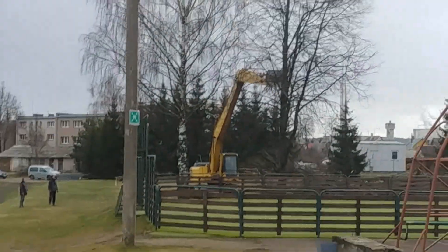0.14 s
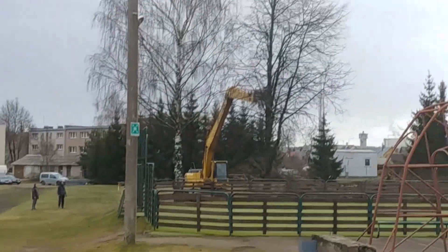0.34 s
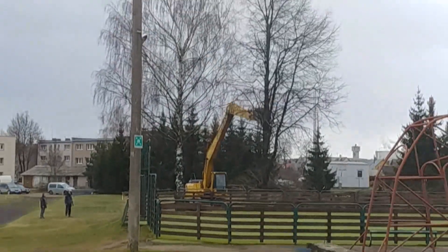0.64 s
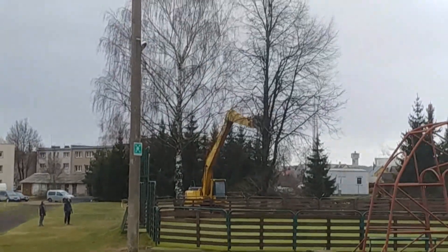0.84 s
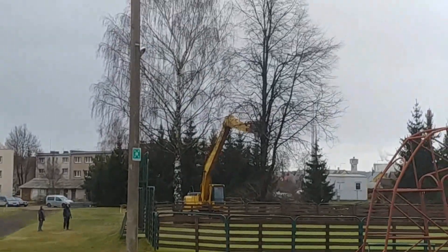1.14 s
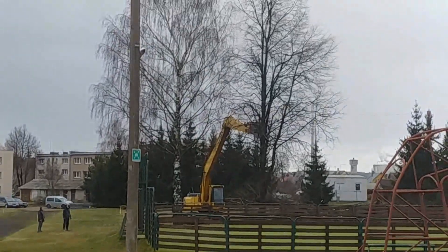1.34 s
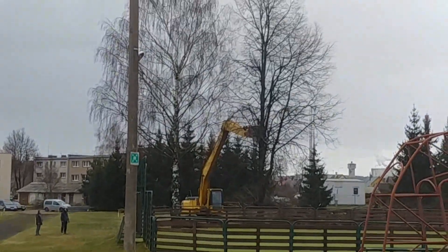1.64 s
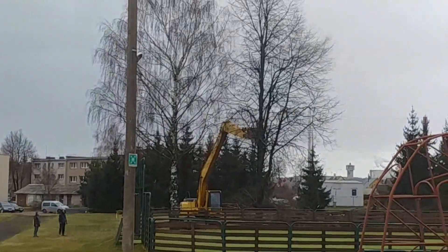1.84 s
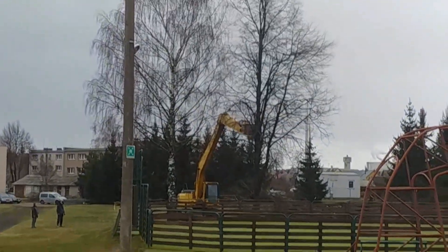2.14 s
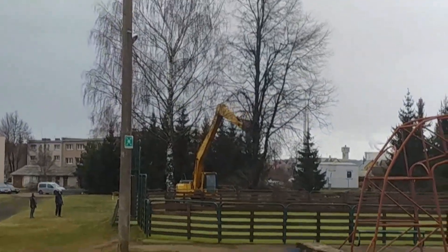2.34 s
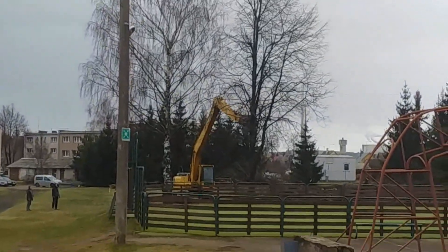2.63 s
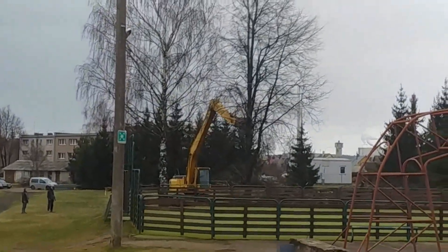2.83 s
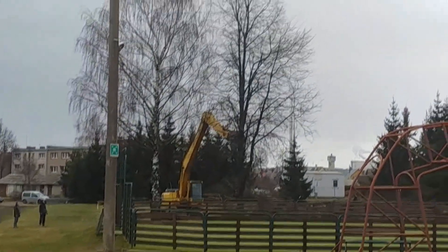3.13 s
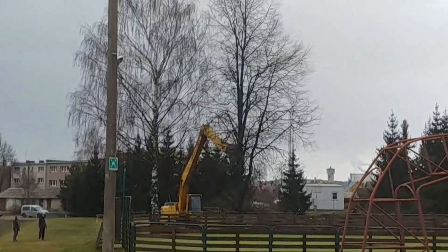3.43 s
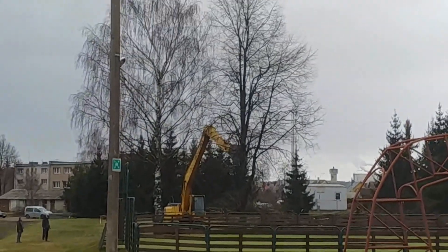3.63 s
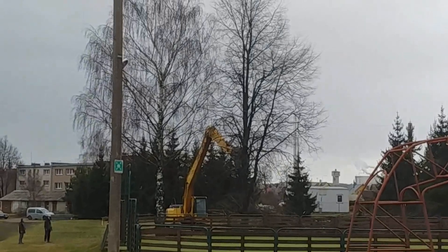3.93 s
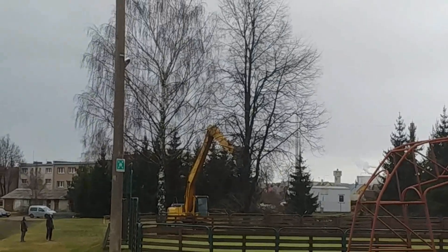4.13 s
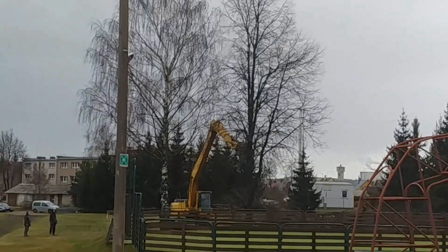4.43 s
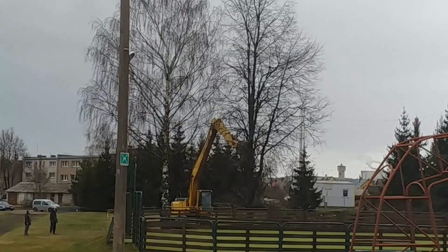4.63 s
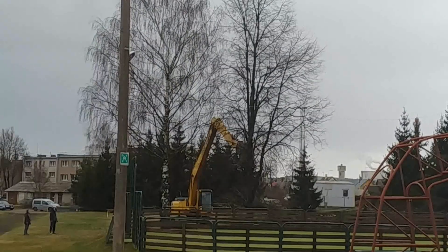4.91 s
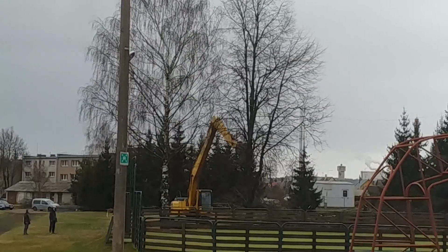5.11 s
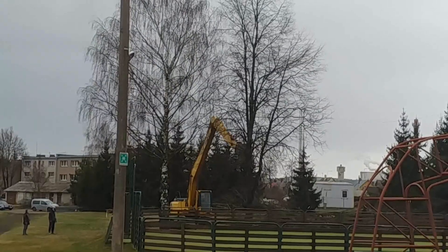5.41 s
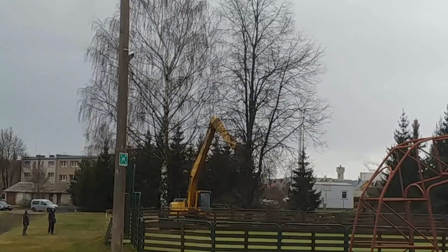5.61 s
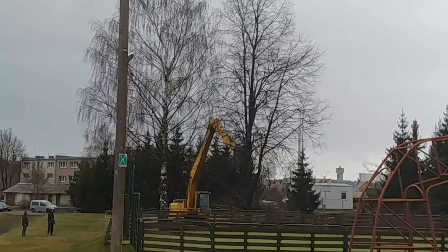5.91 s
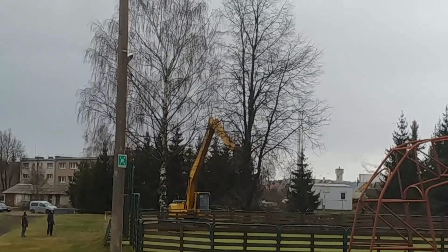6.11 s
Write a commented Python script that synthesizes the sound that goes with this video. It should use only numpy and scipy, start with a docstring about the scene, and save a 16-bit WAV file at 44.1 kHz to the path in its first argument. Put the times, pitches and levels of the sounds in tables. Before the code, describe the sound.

A diesel excavator drones steadily across a park while tree limbs crack, splinter and snap, building to heavy breaks and a thump.

```python
"""Across a park, a six-cylinder diesel excavator drones throughout while its grab tears limbs from a tall tree.
At once a dry limb breaks in a run of fibre fractures; a faint high rustle brushes the left side until past 2 s.
A limb squeaks at 1 s, a swish falls in pitch near 1.8 s, and snaps and twig crackle thicken after 2.2 s.
From 3.7 s the trunk jolts too; near 5 s a big limb gives way and thumps down, and the last breaks end the scene.
Noise, sines and random clicks are filtered into each source; trees and house fronts scatter the cracks back."""
import sys
import numpy as np
from scipy import signal
from scipy.fft import rfft, irfft, next_fast_len
from scipy.io import wavfile
from scipy.ndimage import map_coordinates

SR = 44100
rng = np.random.default_rng(int(sys.argv[2]) if len(sys.argv) > 2 else 0)


def to_wav(s):
    """Save 16-bit WAV."""
    ch = np.atleast_2d(s).T  # columns
    pcm = np.round(np.clip(ch, -1, 1) * 32767)  # PCM
    wavfile.write(sys.argv[1], SR, pcm.astype(np.int16))


N = 276192


def amp(db):
    """Level to gain: 20 dB is a factor of ten in amplitude."""
    return 10 ** (np.asarray(db) / 20)


def unit(x):
    """Normalisation to an rms of 1."""
    return x / np.sqrt(np.mean(x ** 2) + 1e-20)


def along(points, hz):
    """Interpolation of (f/Hz, value) points on a logarithmic frequency axis."""
    f, v = np.transpose(points)
    return np.interp(np.log(hz + 1), np.log(f + 1), v)


def curves(rows):
    """Linear interpolation in time: one value per sample for each column after t/s."""
    s, *columns = np.transpose(rows)
    return [np.interp(np.arange(N) / SR, s, column) for column in columns]


def wobble(rate):
    """Slow random modulation: a smooth curve through rate random knots a second."""
    return map_coordinates(rng.standard_normal(1024), [np.arange(N) * rate / SR], mode="wrap")


RISE_SHARE = 0.61  # a swell rises by 20 dB in this share of its fade time


def swells(rows):
    """Exponential envelopes of (t/s, level/dB, fade/s): each rises to its height, then falls 20 dB per fade."""
    t = np.arange(N) / SR
    levels = [db - 20 * np.maximum(t - s, (s - t) / RISE_SHARE) / fade for s, db, fade in rows]
    return amp(np.max(levels, axis=0))


def filtered(x, response):
    """Linear filtering: the spectrum is multiplied by a response of frequency."""
    size = next_fast_len(N + 8192)
    return irfft(rfft(x, size) * response(np.fft.rfftfreq(size, 1 / SR)), size)[..., :N]


def causal(gain):
    """Minimum phase: folding the cepstrum gives the response of this gain that rings only after the blow."""
    cepstrum = irfft(np.log(np.maximum(gain, 1e-6)))
    half = len(cepstrum) // 2
    cepstrum[1:half] *= 2
    cepstrum[half + 1:] = 0
    return np.exp(rfft(cepstrum))


# Interaural coherence of diffuse sound: f/Hz, left-right likeness/1
COHERENCE = [(25, 0.68), (70, 0.91), (200, 0.85), (600, 0.75), (2000, 0), (5000, 0.17), (10000, 0)]


def mid_side_gains(hz):
    """Coherence: the balance of sum and difference signals sets how alike left and right are."""
    turn = np.arccos(np.clip(along(COHERENCE, hz), -1, 1)) / 2
    return np.array([np.cos(turn), np.sin(turn)])


def spread(pair, spectrum):
    """Partial coherence: two unrelated signals are coloured and blended into a stereo pair of rms 1."""
    mid, side = filtered(pair, lambda hz: amp(along(spectrum, hz)) * mid_side_gains(hz))
    return unit(np.array([mid + side, mid - side]))


def tail(decay, rise, size):
    """Reverberation: stereo noise of energy 1 builds up over rise/s and decays by its t60 at each frequency."""
    hz, t, z = signal.stft(rng.standard_normal((2, size)), SR, nperseg=256)
    z = z * mid_side_gains(hz)[:, :, None]
    z = z * amp(-60 * t / along(decay, hz)[:, None]) * (1 - np.exp(-t / rise))
    mid, side = signal.istft(z, SR, nperseg=256)[1][:, :size]
    return np.array([mid + side, mid - side]) / np.linalg.norm([mid, side])


def add(track, s, sound):
    """Superposition: a stereo sound is summed in at time s."""
    start = max(round(s * SR), 0)
    track[:, start:start + sound.shape[1]] += sound[:, :max(N - start, 0)]


def ticks(rate, spread_db):
    """Random point process: tiny snaps at a mean rate per second, a few much larger than the rest."""
    sizes = amp(spread_db * np.minimum(rng.exponential(size=(2, N)), 4))
    happens = rng.random((2, N)) < rate / SR
    return happens * rng.choice([-1, 1], (2, N)) * sizes


LAWN_DELAY_S, LAWN_ECHO = .0019, .35  # lag of the ground path, its share before the band limits
LAWN_LOW_HZ, LAWN_SOFT_HZ = 850, 4000  # the bounce fades out below and above these


def grounded(x):
    """Comb interference: far sound also bounces off the ground a moment later, which hollows its mid range."""
    def response(hz):
        share = LAWN_ECHO * hz ** 4 / (hz ** 4 + LAWN_LOW_HZ ** 4) / (1 + (hz / LAWN_SOFT_HZ) ** 4)
        bounce = share * np.exp(-2j * np.pi * hz * LAWN_DELAY_S)
        return (1 + bounce) / np.hypot(1, share)
    return filtered(x, response)


# Firing rate, racing when the load lets go and sagging when it bites: t/s, f/Hz
FIRING_RATE = [(0, 90), (.09, 94.3), (.17, 93), (.27, 91.2), (.43, 88.9), (.8, 90.3), (1.09, 90.6),
               (1.23, 95.6), (1.42, 95.3), (1.53, 92.6), (1.75, 91.6), (2.35, 92.5), (2.75, 92.5),
               (3.05, 91.4), (4.2, 91.2), (5, 91.9), (6.26, 92.2)]
# Exhaust note, before drift and stereo balance: t/s, level/dB
EXHAUST_NOTE = [(0, -27), (.14, -27.5), (.19, -23), (1.17, -20), (1.25, -26.5), (1.42, -25.5),
                (1.53, -17.5), (1.62, -20.7), (2.39, -19.5), (2.65, -24), (2.98, -20), (3.38, -22),
                (3.9, -19), (4.3, -22), (4.6, -19.5), (5.42, -17), (5.49, -19.7), (6.26, -19)]
# Exhaust rumble, before drift and stereo balance: t/s, level/dB
EXHAUST_RUMBLE = [(0.0, -32), (4.44, -34), (4.53, -21.5), (4.58, -33.5), (4.93, -35.5), (5.02, -26),
                  (6.01, -32), (6.26, -23)]
# Overtones up to the whine of fan and pump: multiple of the six-firing cycle rate/1,
# level/dB (sine amplitude re the mean exhaust note, before fading)
CYCLE_OVERTONES = [(4, -34.5), (5, -30.5), (7, -35), (8, -25), (9, -25.5), (10, -19), (11, -26.5),
                   (12, -16.5), (13, -30), (14, -24), (15, -27.5), (17, -25), (18, -31.5), (22, -38),
                   (26, -31.5), (34, -37), (36, -30), (39, -37.5), (108, -46.5)]
# Spectrum of the rumble: f/Hz, relative level/dB per Hz
RUMBLE_COLOUR = [(20, -28.5), (36, -21), (52, -7), (72, 4), (110, 3.5), (160, -2.5), (215, -4),
                 (255, -18.5), (310, -22), (450, -46), (900, -75)]
# Spectrum of the clatter, before the ground bounce: f/Hz, relative level/dB per Hz
CLATTER_COLOUR = [(250, -5), (340, 2.5), (450, -0.5), (570, 0.5), (760, -5.5), (1100, -12.5), (1380, -12.5),
                  (1650, -14.5), (2300, -21.5), (3300, -19), (4600, -24.5), (7500, -27.5), (10500, -39.5),
                  (15500, -35.5)]
CLATTER_DB = -49  # before drift, ground bounce and stereo balance
OVERTONE_FADE_DB, OVERTONE_DRIFT_RAD = 2.4, .12  # drift also grows with the root of the multiple
CHUG = .35  # depth of the rumble's pulsing


def engine():
    """Harmonic series: a tone at the firing rate, overtones in sixths of it from unequal cylinders, and noise."""
    (firing_hz,), (note_db,), (rumble_db,) = curves(FIRING_RATE), curves(EXHAUST_NOTE), curves(EXHAUST_RUMBLE)
    phase = 2 * np.pi * np.cumsum(firing_hz) / SR
    cycle = phase / 6  # six firings make one working cycle

    # moving air makes each tone fade and drift on its own
    note = np.sqrt(2) * amp(note_db - 0.56 + 0.56 * wobble(14)) * np.sin(phase)
    overtones = 0
    for multiple, db in CYCLE_OVERTONES:
        drift = OVERTONE_DRIFT_RAD * np.sqrt(multiple) * wobble(12)
        overtones = overtones + amp(db + OVERTONE_FADE_DB * wobble(6)) * np.sin(round(multiple) * cycle + drift)
    tones = note + amp(note_db.mean()) * overtones

    chug = 1 + CHUG * np.sin(2 * cycle + wobble(4))
    rumble = spread(chug * rng.standard_normal((2, N)), RUMBLE_COLOUR)
    rumble = amp(rumble_db + 0.24 + .5 * wobble(4.3)) * rumble

    beats = 1 + 0.14 * np.sin(phase) + 0.058 * np.sin(2 * cycle)
    clatter = grounded(spread(beats * rng.standard_normal((2, N)), CLATTER_COLOUR))
    clatter = amp(CLATTER_DB + wobble(9)) * clatter
    return tones * amp([[1.7], [-2]]) + (rumble + clatter) * amp([[1.3], [-1.3]])


TOP_HZ = 15900  # upper band limit
# Brushes, before flutter and stereo balance: t/s (at the height), level/dB, fade time/s
RUSTLE_BRUSHES = [(.218, -49, 0.061), (.45, -56.5, 0.22), (.58, -62, 0.26), (.78, -64.5, 0.26),
                  (1.67, -73, 0.25), (1.937, -47.5, 0.057), (2.23, -63.5, 0.086)]
# Spectrum of the rustle: f/Hz, relative level/dB per Hz
RUSTLE_SPECTRUM = [(2000, -39), (6000, -13.5), (10500, -25), (13000, -14.5), (15500, -8)]
RUSTLE_FLUTTER_DB = 1.8


def rustle():
    """Amplitude-modulated noise: a thin, very high hiss comes in a few brushes, mostly on the left."""
    noise = rng.standard_normal((2, N))
    hiss = filtered(noise, lambda hz: amp(along(RUSTLE_SPECTRUM, hz)) * (hz < TOP_HZ))
    flutter = amp(RUSTLE_FLUTTER_DB * wobble(32))
    return swells(RUSTLE_BRUSHES) * flutter * unit(hiss) * amp([[4], [-11]])


SWISH_S, SWISH_DB, SWISH_FADE_S = 1.82, -57.5, .4
SWISH_HZ, SWISH_OCTAVES_PER_S, SWISH_WIDTH_HZ = 4100, -3, 1400


def swish():
    """Ring modulation: low noise times a falling sine gives a narrow hiss, a branch sweeping through the crown."""
    octaves = np.clip(SWISH_OCTAVES_PER_S * (np.arange(N) / SR - SWISH_S), -.5, .5)
    centre_hz = SWISH_HZ * 2 ** octaves
    low_noise = filtered(rng.standard_normal((2, N)), lambda hz: np.exp(-(hz / SWISH_WIDTH_HZ) ** 2))
    hiss = unit(low_noise * np.sin(2 * np.pi * np.cumsum(centre_hz) / SR))
    return swells([(SWISH_S, SWISH_DB, SWISH_FADE_S)]) * hiss


# Jolts of the heavy trunk: t/s, level/dB (before mode levels and stereo balance), f/Hz struck hardest
TRUNK_JOLTS = [(3.755, -20, 395), (5.039, -21, 333), (5.124, -18, 303), (6.168, -15, 219),
               (6.251, -16, 280)]
# Modes of the trunk: f/Hz, relative level/dB
TRUNK_MODES = [(215, 0.5), (275, -2), (335, -3.5), (395, -1.5), (485, -2.5)]
TRUNK_T60_S, JOLT_DB_PER_OCTAVE = .13, 14  # decay; loss of a mode away from the struck pitch
THUMP_S, THUMP_HZ, THUMP_DB = 5.228, 66, -15  # thump level before stereo balance


def thuds():
    """Modal synthesis: decaying low modes as big limbs give way, and one deep thump as the wood comes down."""
    out = np.zeros((2, N))
    t = np.arange(SR // 2) / SR
    envelope = amp(-60 * t / TRUNK_T60_S) * (1 - np.exp(-t / 0.00049)) * amp([[1], [-1]])
    for s, db, struck_hz in TRUNK_JOLTS:
        modes = 0
        for hz, mode_db in TRUNK_MODES:
            loss_db = JOLT_DB_PER_OCTAVE * abs(np.log2(hz / struck_hz))
            modes = modes + amp(db + mode_db - loss_db) * np.sin(2 * np.pi * hz * t)
        add(out, s, envelope * modes)
    add(out, THUMP_S, envelope * amp(THUMP_DB) * np.sin(2 * np.pi * THUMP_HZ * t))
    return out


# Decay among the nearby trees: f/Hz, t60/s
THICKET_DECAY = [(200, 0.12), (1500, 0.055), (8000, 0.088)]
SPLINTERS_PER_S, SPLINTER_TOP_HZ = 90, 7500
SPLINTER_HZ, SPLINTER_OCTAVES, SPLINTER_CYCLES = 2640, 0.55, 4.4  # typical pitch, scatter, cycles to -60 dB


def splinters(size=512):
    """Damped oscillation: single twigs snap at random, each with its own pitch, size and side; rms 1."""
    t, out = np.arange(size) / SR, np.zeros((2, N))
    count = round(SPLINTERS_PER_S * N / SR)
    times = rng.random(count) * N / SR
    traits = np.clip(rng.standard_normal((count, 3)), -2, 2)
    for s, (pitch, big, side) in zip(times, traits):
        hz = min(SPLINTER_HZ * 2 ** (SPLINTER_OCTAVES * pitch), SPLINTER_TOP_HZ)
        decay = amp(2.6 * big - 60 * t * hz / SPLINTER_CYCLES)
        snap = np.sin(2 * np.pi * hz * t) * decay * (1 - np.exp(-t * hz))
        add(out, s, snap * amp([[2 * side], [-2 * side]]))
    scattered = signal.fftconvolve(out, tail(THICKET_DECAY, rise=0.0058, size=4096), axes=1)[:, :N]
    return unit(filtered(out + scattered, lambda hz: 1 / (1 + (hz / SPLINTER_TOP_HZ) ** 10)))


# Limbs crushed in the grab and pulled through the crown: t/s (at the height), crunch level/dB,
# twig crackle level/dB (both before clumping, ground bounce and stereo balance), fade time/s
LIMB_DRAGS = [(.2, -44.5, -41, 0.29), (0.459, -44.5, -48.5, 0.28), (.78, -39.5, -68, 0.19),
              (.9, -47.5, -55, 0.41), (1.18, -47.5, -72.5, 0.61), (1.6, -48.5, -61.5, 0.31),
              (2.281, -47, -56.5, 0.39), (2.651, -42, -49, 0.39), (2.88, -45, -53.5, 0.33),
              (3.2, -52.5, -63, 0.75), (3.959, -41.5, -50, 0.38), (4.38, -50.5, -52.5, 0.73),
              (4.8, -52.5, -63.5, 0.41), (5.131, -41.5, -37, 0.23), (5.48, -52.5, -46.5, 0.085),
              (5.85, -51.5, -78, 1), (6.21, -33, -35.5, 0.17)]
# Spectrum of the crunch: f/Hz, relative level/dB per Hz
CRUNCH_SPECTRUM = [(180, -14.5), (380, 5.5), (750, 2.5), (1150, 3.5), (1380, -3.5), (1650, -1), (2200, -13),
                   (3500, -30.5), (7000, -53.5)]
# Spectrum of the fine twig ticks: f/Hz, relative level/dB per Hz
TWIG_SPECTRUM = [(700, -30.5), (1500, 0), (2000, -2.5), (2400, 1.5), (3300, -2), (4700, -5.5),
                 (7200, -11.5), (9000, -28), (10500, -54.5)]
CLUMP_DB = 2.4  # twigs and bark give way in clumps
SPLINTER_DB = -2.5  # single snaps re the fine ticks
SQUEAK_S, SQUEAK_HZ, SQUEAK_DB, SQUEAK_FADE_S = 1.007, 1595, -43.5, .05


def twigs():
    """Granular noise: bark crunches and twigs tick with each drag; a phase-modulated sine is one limb's squeak."""
    s, crunch_db, twig_db, fade = np.transpose(LIMB_DRAGS)

    crunch = spread(ticks(rate=600, spread_db=2.0), CRUNCH_SPECTRUM)
    crunch = swells(zip(s, crunch_db, fade)) * amp(CLUMP_DB * wobble(50)) * crunch

    fine = spread(ticks(rate=2200, spread_db=3.0), TWIG_SPECTRUM)
    crackle = fine + amp(SPLINTER_DB) * splinters()
    crackle = swells(zip(s, twig_db, fade)) * amp(CLUMP_DB * wobble(40)) * crackle

    squeak = np.sin(2 * np.pi * SQUEAK_HZ * np.arange(N) / SR + 2 * wobble(250))
    squeak = swells([(SQUEAK_S, SQUEAK_DB, SQUEAK_FADE_S)]) * squeak
    return (crunch + crackle + squeak) * amp([[1.1], [-1.1]])


BUILD_SHARE = .18  # time constant of a tear's build-up, as a share of its tearing time


def fibres(tearing, grain_db, rate, size):
    """Fracture cascade: uneven clicks follow a first one, build up and fade 20 dB per tearing time."""
    t = np.arange(size) / SR
    tearing = max(tearing, .003)
    happens = rng.random(size) < rate / SR
    clicks = happens * rng.choice([-1, 1], size) * amp(grain_db * rng.standard_normal(size))
    clicks[0] = 1
    build_up = 1 - 0.58 * np.exp(-t / (BUILD_SHARE * tearing))
    return clicks * amp(-20 * t / tearing) * build_up


SHARDS_PER_S, SHARD_DB, SHARD_SCATTER_DB = 110, -18, 3  # level re the tear's opening burst
SHARD_WAIT_S, SHARD_FADE_S = .015, .15  # silence before the first shard; time to fade 20 dB


def shards(force):
    """Aftershocks: loose shards snap off one by one after a tear, scaled to its opening burst."""
    size = len(force)
    t = np.arange(size) / SR
    snaps = (rng.random(size) < SHARDS_PER_S / SR) * rng.choice([-1, 1], size) * (t > SHARD_WAIT_S)
    scatter_db = SHARD_SCATTER_DB * np.clip(rng.standard_normal(size), -2, 2)
    level_db = SHARD_DB + scatter_db - 20 * t / SHARD_FADE_S
    return snaps * amp(level_db) * np.linalg.norm(force[t < SHARD_WAIT_S])


# Spectrum of ringing wood: f/Hz, relative level/dB per Hz
WOOD_COLOUR = [(100, -30.5), (220, 6.5), (400, 0), (750, -0.5), (1100, -2.5), (1400, -3.5), (2100, 1),
               (2500, -5), (3400, -2.5), (4600, -14.5), (7000, -22.5), (8800, -33.5), (10500, -63),
               (15000, -72)]
# Resonances of a long limb: f/Hz, half width/Hz, weight of the ring/1
LIMB_RESONANCES = [(600, 230, 2.0), (1135, 100, 1.7), (3100, 350, .35)]
# Knock, body, snap and splinter bands: lower f/Hz, upper f/Hz
CRACK_BANDS = [(300, 700), (700, 1800), (1800, 4200), (4200, 9000)]
# Balance of those bands at neutral brightness: level/dB
CRACK_BALANCE = [-9, 2, -0.5, -10]
PIVOT_HZ = 1850  # brightness tilts a crack about this frequency
KNOCK_OCTAVES, KNOCK_DRAW = .21, 0.23  # half width; share of the lift taken off the whole spectrum


def wood(force, db, brightness, ring_db, knock_hz, knock_db):
    """Source-filter model: a force excites the limb's resonances and the knock of the broken piece."""
    hz = np.fft.rfftfreq(force.shape[1], 1 / SR)
    resonances = sum(weight / (1 + ((hz - centre) / width) ** 2) for centre, width, weight in LIMB_RESONANCES)
    colour_db = along(WOOD_COLOUR, hz) + max(ring_db, 0) * resonances
    ring = rfft(force) * causal(amp(colour_db))

    # strength and brightness set each band's level over its first 10 ms, before the knock
    mono = ring.mean(axis=0)
    onset = [np.std(irfft(mono * (hz > low) * (hz < high))[:SR // 100]) for low, high in CRACK_BANDS]
    centres = np.sqrt(np.prod(CRACK_BANDS, axis=1))
    tilt_db = brightness * np.log2(centres / PIVOT_HZ)
    lift_db = db + np.asarray(CRACK_BALANCE) + tilt_db - 20 * np.log10(onset)
    lift = along(np.column_stack([centres, lift_db]), hz)

    knock = 1 / (1 + (np.log2((hz + 1) / knock_hz) / KNOCK_OCTAVES) ** 2) - KNOCK_DRAW
    return irfft(ring * causal(amp(lift + knock_db * knock)))


# Breaking wood, from dull knocks to bright snaps: t/s, strength level/dB, brightness/dB per octave,
# tearing time/s, knock f/Hz, knock level/dB (levels before echoes, ground bounce and stereo balance)
BREAKS = [(.001, -39.5, -0.5, 0.012, 1680, 1), (0.056, -33, 1, 0.0087, 2120, 3.5),
          (.168, -24.5, 0.75, 0.0084, 603, 4), (0.172, -30, -0.5, 0.014, 1145, 6.5),
          (.183, -36, 4, 0.01, 1670, 10), (.209, -37, 2, 0.013, 1150, 5.5),
          (.219, -41.5, 5, .008, 3000, -5), (.231, -38.5, 6, .014, 1700, 7),
          (0.248, -42.5, 2, 0.012, 1150, -1), (.686, -49.5, -11, 0.044, 735, -3.5),
          (.755, -52, -12.5, 0.022, 800, 6), (1.002, -53.5, -11, 0.014, 1600, 7.5),
          (1.459, -58.5, -14.5, 0.016, 697, 6.5), (1.55, -61.5, -11, 0.053, 1150, 7.5),
          (1.63, -63, 8.5, 0.0096, 4300, 8.5), (1.894, -52.5, 7.5, 0.013, 3180, 3.5),
          (2.2255, -44, 6, 0.0093, 3500, 3), (2.229, -52, 14, 0.011, 6860, 4.5),
          (2.247, -53, -6, 0.0052, 630, 17), (2.286, -46, 0.5, 0.017, 1600, 1),
          (2.319, -60, -1, 0.0061, 800, 5.5), (2.548, -62, 9.5, 0.024, 7400, 18),
          (2.599, -60.5, -12.5, 0.025, 624, 6), (2.624, -48.5, -8.5, 0.016, 600, 9.5),
          (2.681, -43, 5.5, .03, 3420, 1), (2.697, -46.5, 0, 0.015, 1070, 2),
          (2.711, -48.5, 6.5, 0.0091, 3400, -4.5), (2.861, -49, -2.5, 0.02, 1100, 5),
          (2.875, -50.5, 1, 0.029, 2890, 8), (3.754, -42, -6.5, 0.014, 483, 7),
          (3.761, -37, -3.5, .02, 1540, 3.5), (3.779, -46.5, 5, 0.0096, 2080, 7),
          (3.796, -48.5, 2.5, 0.0091, 1600, 8), (3.844, -49, -7, .004, 1610, 1),
          (3.875, -47, -1.5, .012, 1110, 5), (3.9284, -39.5, -3, 0.012, 1560, 2),
          (3.989, -48, -3, .03, 1600, 5), (4.244, -41, -4, 0.009, 1620, 11),
          (4.258, -47, -3, 0.0081, 1540, 2), (4.334, -51, -1.5, .012, 1910, 13),
          (4.3677, -41.5, -3.5, 0.004, 1490, 0), (4.393, -42, -0.5, 0.021, 1450, 6),
          (4.491, -39, -5.5, 0.014, 1530, 13), (4.517, -46, 2.5, 0.016, 1050, 9.5),
          (4.562, -45.5, -3.5, 0.0074, 2090, 0), (4.724, -51.5, -3, 0.015, 2100, 5.5),
          (4.829, -50, -5, .012, 1680, 9.5), (4.986, -49.5, -7.5, .006, 1100, -2.5),
          (4.9942, -47, -6, 0.0057, 1120, 2), (5.006, -41.5, 0, 0.012, 1590, 12.5),
          (5.037, -28, -2.5, 0.015, 1125, 4), (5.051, -32.5, -1, 0.0096, 1660, 16),
          (5.0754, -30, -2, 0.0065, 1146, 6.5), (5.086, -44.5, 3, 0.0056, 1160, 7),
          (5.116, -40, -0.5, 0.016, 1000, 11), (5.123, -25, -3, 0.0075, 850, 5.5),
          (5.158, -42, -1, 0.0058, 1500, 0), (5.209, -54, -1.5, 0.011, 950, 7),
          (5.225, -44.5, -5.5, 0.012, 750, 11.5), (5.242, -43, -8.5, 0.011, 770, 9.5),
          (5.278, -44.5, -7.5, 0.007, 777, 5), (5.3201, -36.5, -4, 0.0091, 404, 9.5),
          (5.33, -40, 3.5, 0.0086, 1100, 4), (5.3699, -26, 0, 0.0057, 2050, 2.5),
          (5.386, -45.5, -5, 0.0035, 3300, 14), (5.466, -62.5, -3, 0.0067, 2220, 0.5),
          (5.514, -52.5, 5.5, 0.0029, 5570, 13.5), (5.543, -58.5, 2.5, .005, 3870, 22),
          (5.642, -50, -10.5, 0.018, 373, 0.5), (5.821, -50, -10, 0.0099, 1060, 4),
          (5.852, -41.5, -2.5, .0067, 1830, 10.5), (5.868, -58, 2, .006, 3320, 13),
          (5.912, -49.5, -10, 0.0081, 830, 7), (6.0135, -53.5, -11, 0.013, 794, 4),
          (6.064, -45, -6, 0.007, 6200, 17.5), (6.114, -53, -3, 0.01, 1100, 11),
          (6.132, -23.5, 0.5, 0.0042, 910, 6), (6.1345, -27.5, 2.5, 0.0031, 1700, 9),
          (6.147, -37, 2.5, 0.008, 2080, -3), (6.1701, -26.5, -5, 0.0037, 2070, 5),
          (6.185, -35.5, -1, 0.0083, 3480, 15.5), (6.206, -41, 4, 0.022, 5960, 10.5),
          (6.251, -20, 1.5, 0.011, 1010, 8.5)]
# Decay of the echo from the houses: f/Hz, t60/s
HOUSE_DECAY = [(150, 2.5), (1000, 0.89), (3000, 1.14), (8000, 0.79)]
DRY_LIMB_UNTIL_S, DRY_RING_DB, RING_DB = .5, 7, 1.5  # later limbs ring much less than the first, dry one
THICKET_DB, ECHO_DB = 0, -8


def cracks(size=8192):
    """Multipath propagation: each break arrives directly, scattered by nearby trees and echoed by the houses."""
    out = np.zeros((2, N))
    click = np.eye(1, size)
    for s, db, brightness, tearing, knock_hz, knock_db in BREAKS:
        ring_db = DRY_RING_DB if s < DRY_LIMB_UNTIL_S else RING_DB
        tear = fibres(tearing, grain_db=2.5, rate=4000, size=size)
        force = (tear + shards(tear))[None]
        path = click + amp(THICKET_DB) * tail(THICKET_DECAY, rise=0.012, size=size)
        arriving = signal.fftconvolve(force, path, axes=1)[:, :size]
        add(out, s, wood(arriving, db, brightness, ring_db, knock_hz, knock_db))

        # the houses return a single click of the same wood, with half the ring and knock
        blow = wood(click, db, brightness, ring_db / 2, knock_hz, knock_db / 2)
        houses = tail(HOUSE_DECAY, rise=0.014, size=40960)
        add(out, s, amp(ECHO_DB) * signal.fftconvolve(blow, houses, axes=1))
    return out * amp([[.9], [-.9]])


def scene():
    """Superposition of all sources; an interchannel delay of 0.03 ms sets the tree slightly to the left."""
    tree = grounded(cracks() + twigs())
    tree = filtered(tree, lambda hz: np.exp(1j * np.pi * hz * .00003 * np.array([[1], [-1]])))
    return engine() + rustle() + swish() + thuds() + tree


def record(dry):
    """Band limitation: nothing passes above the upper limit."""
    return filtered(dry, lambda hz: hz < TOP_HZ)


dry = scene()
out = record(dry)
to_wav(out)
```